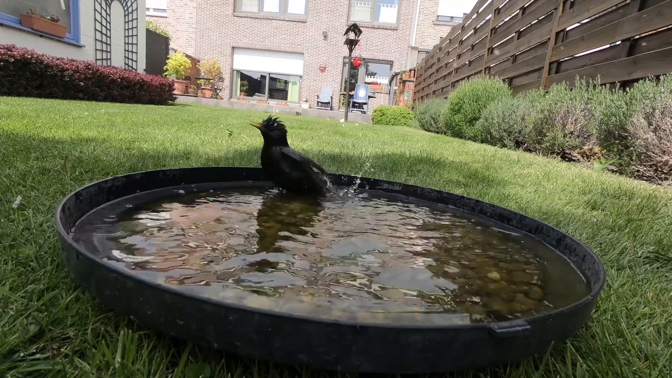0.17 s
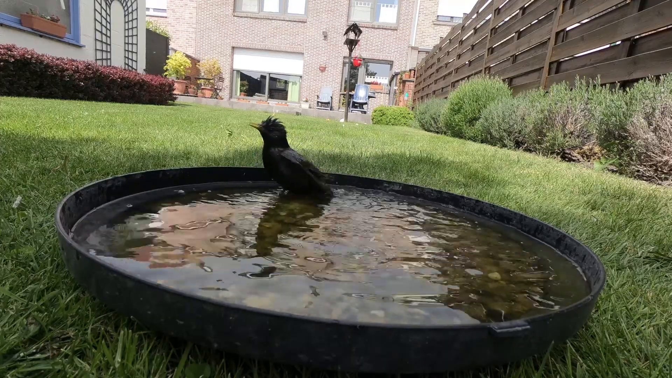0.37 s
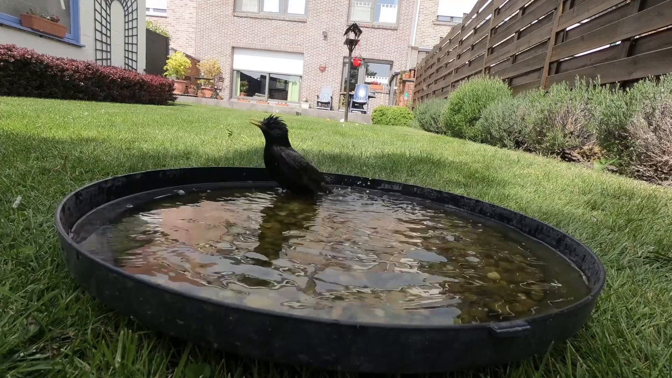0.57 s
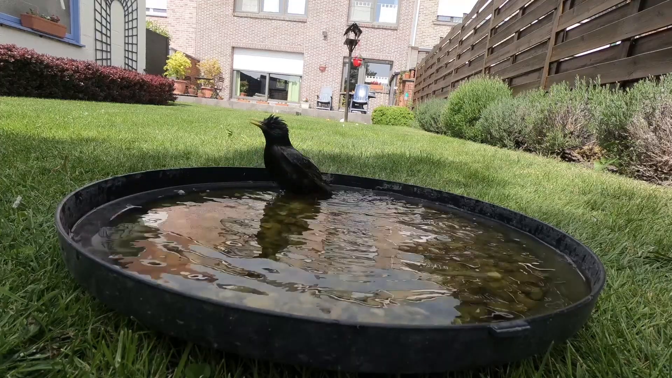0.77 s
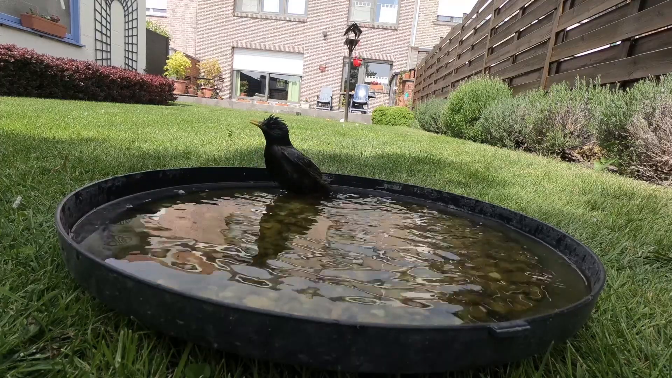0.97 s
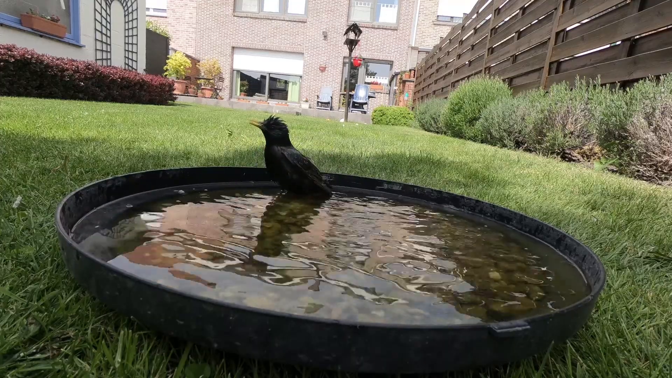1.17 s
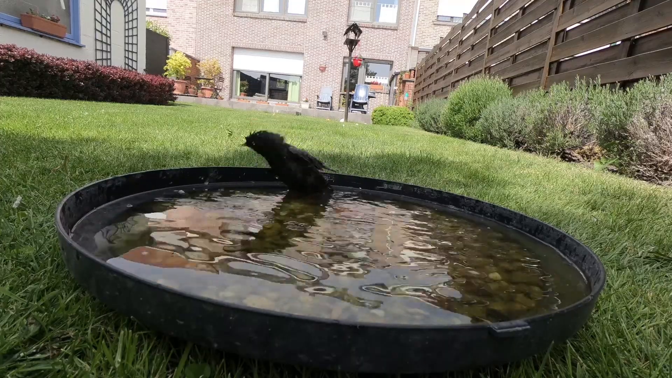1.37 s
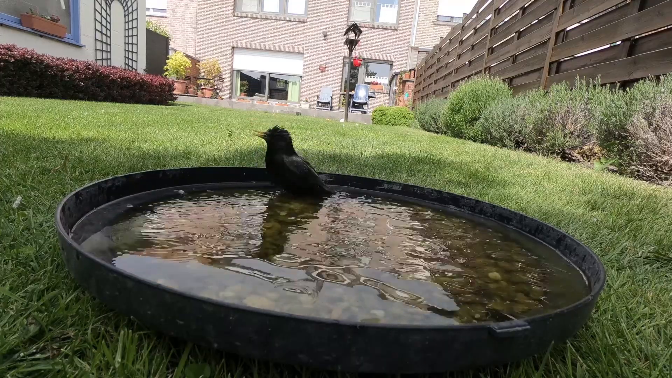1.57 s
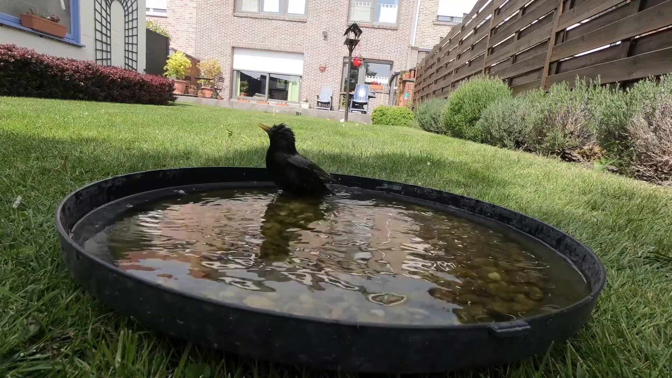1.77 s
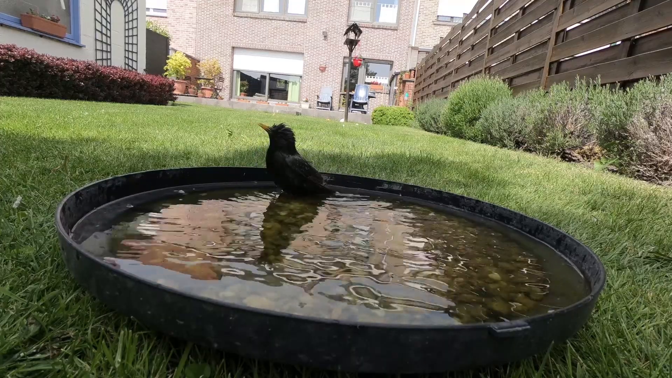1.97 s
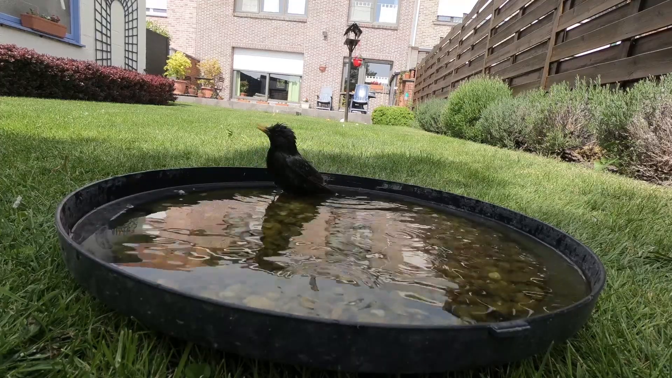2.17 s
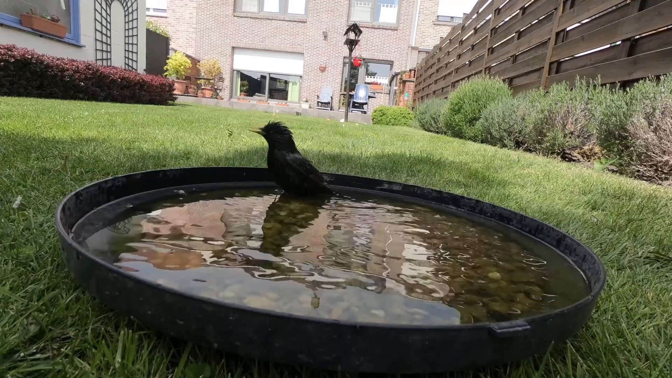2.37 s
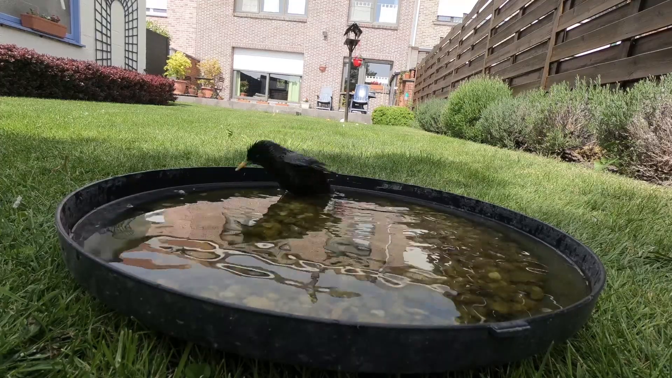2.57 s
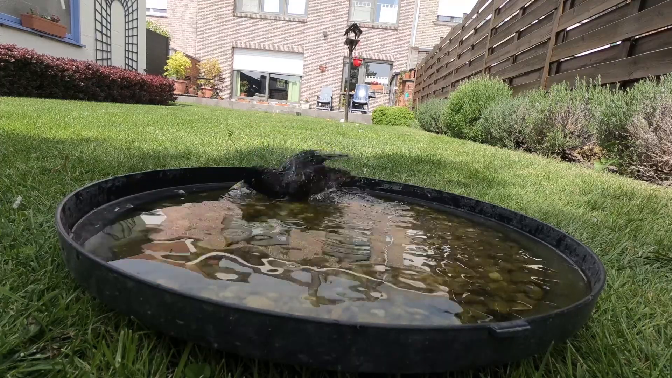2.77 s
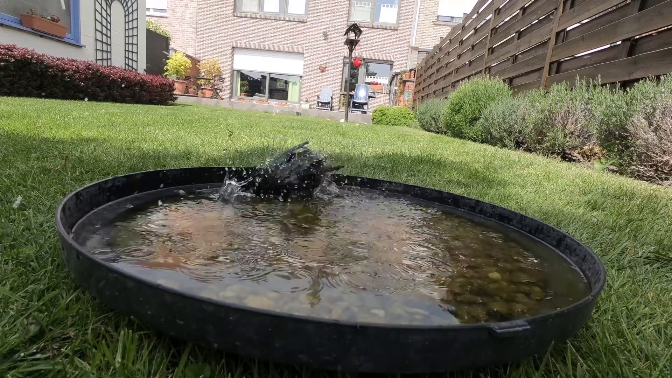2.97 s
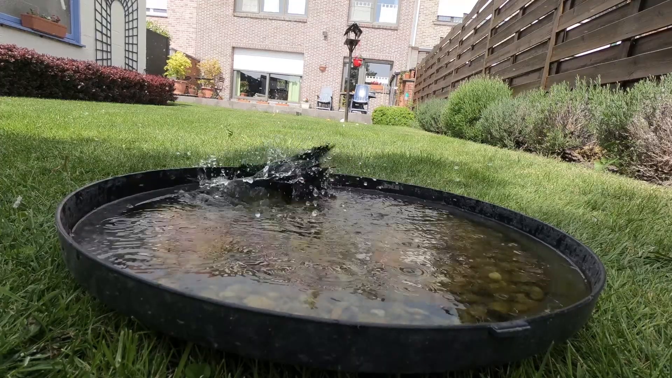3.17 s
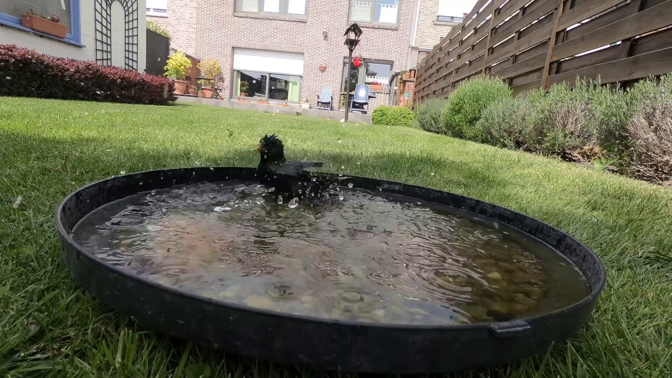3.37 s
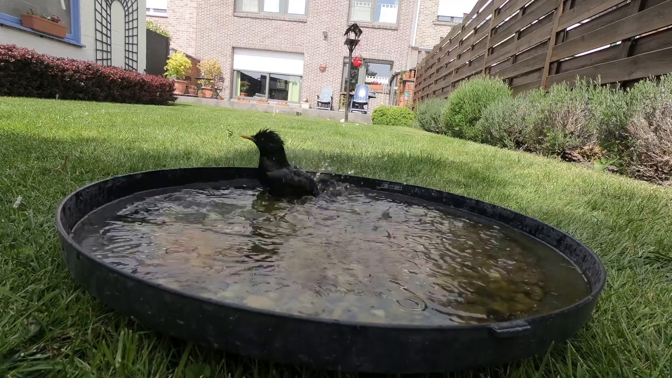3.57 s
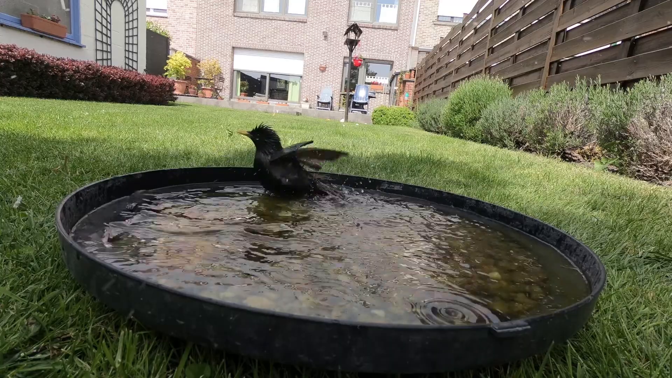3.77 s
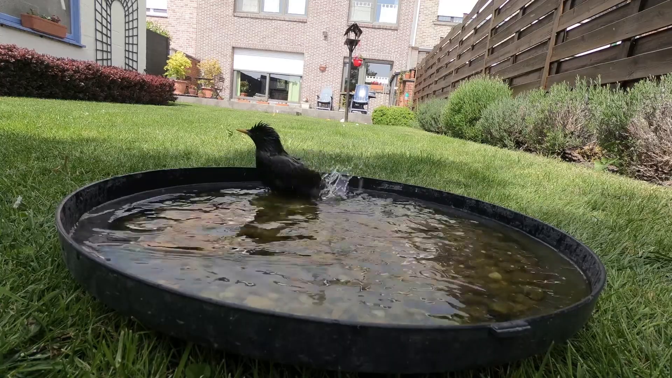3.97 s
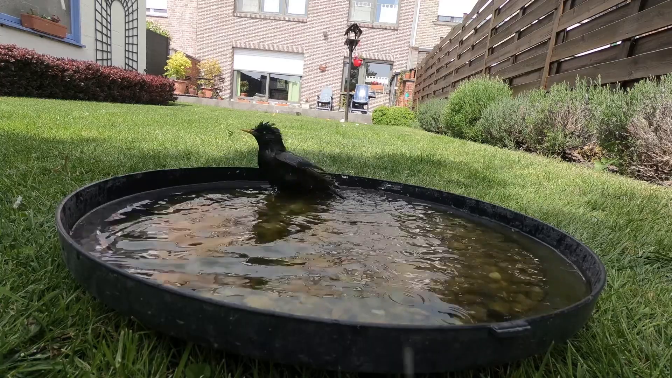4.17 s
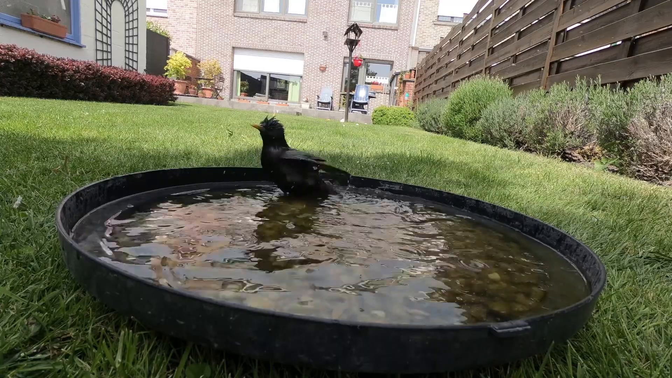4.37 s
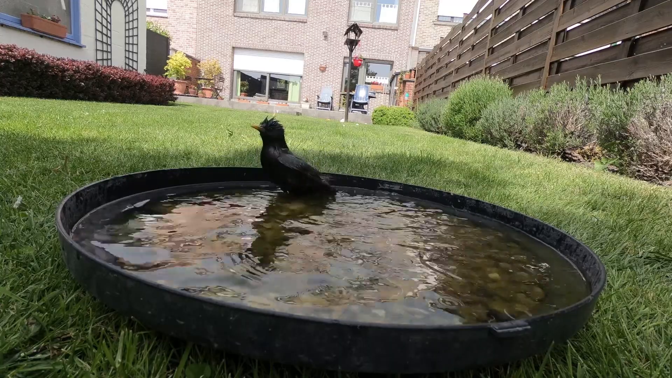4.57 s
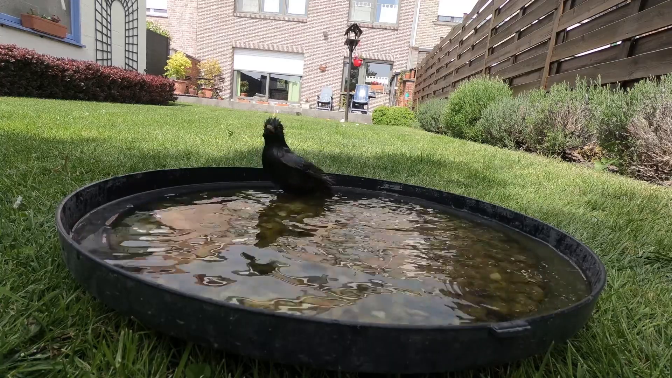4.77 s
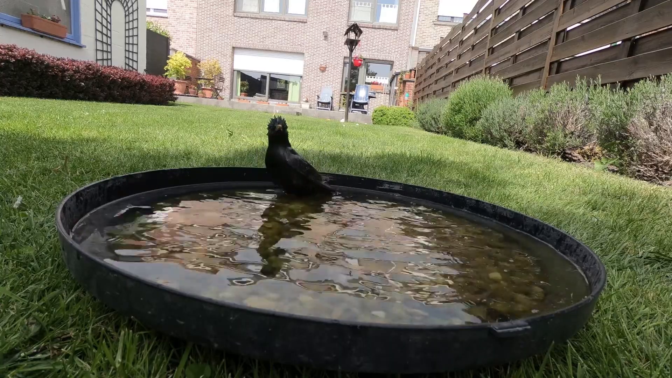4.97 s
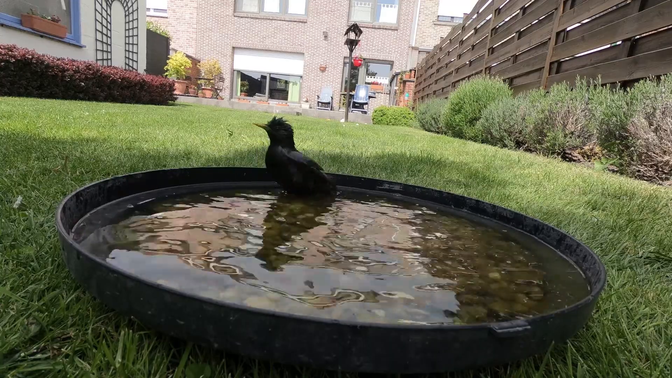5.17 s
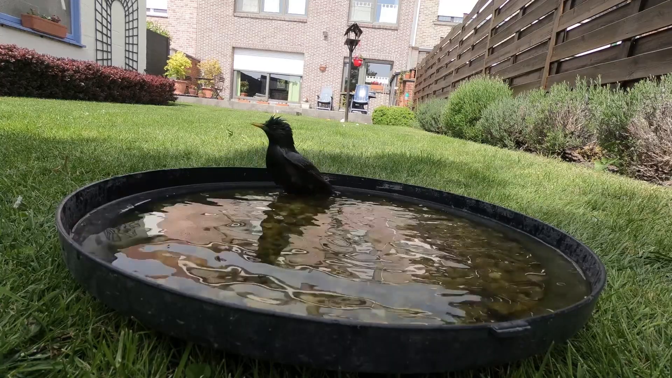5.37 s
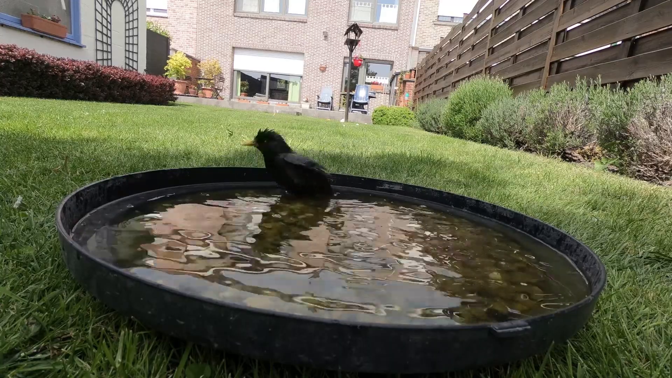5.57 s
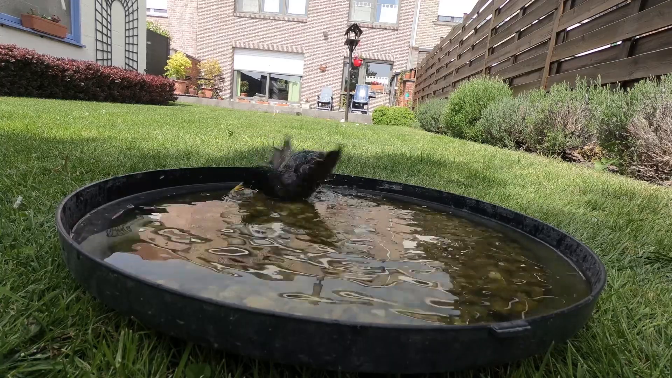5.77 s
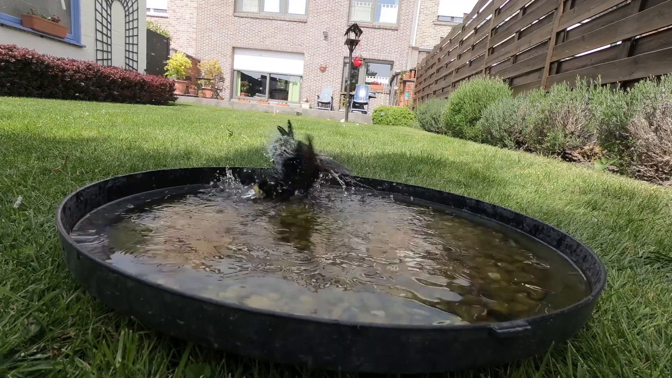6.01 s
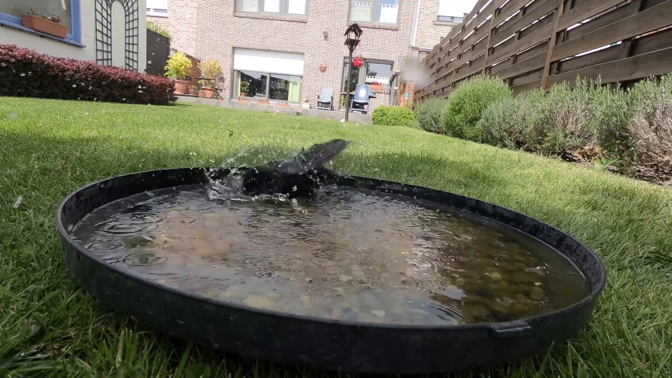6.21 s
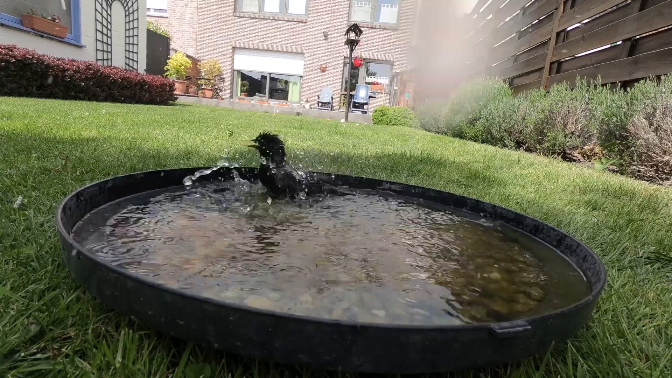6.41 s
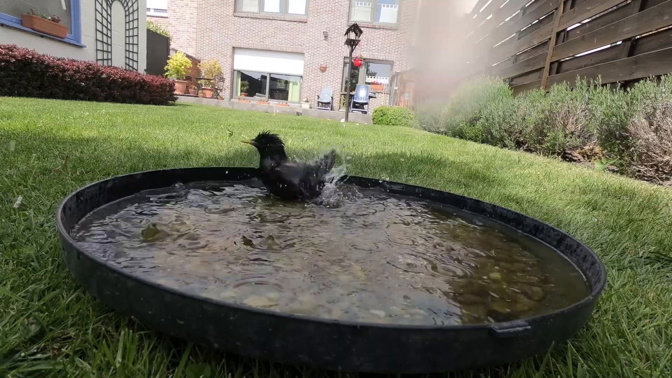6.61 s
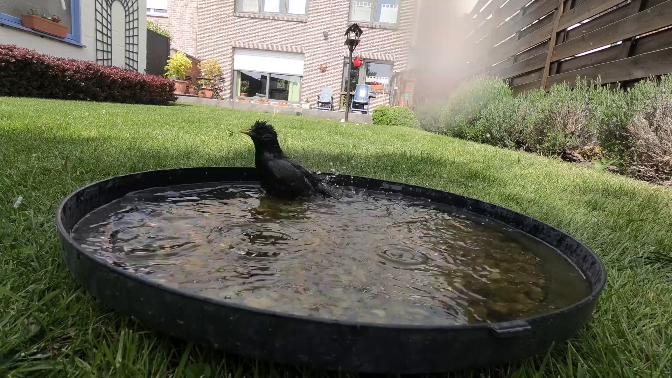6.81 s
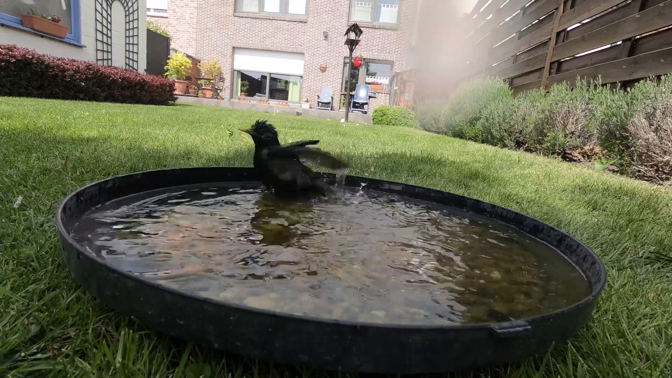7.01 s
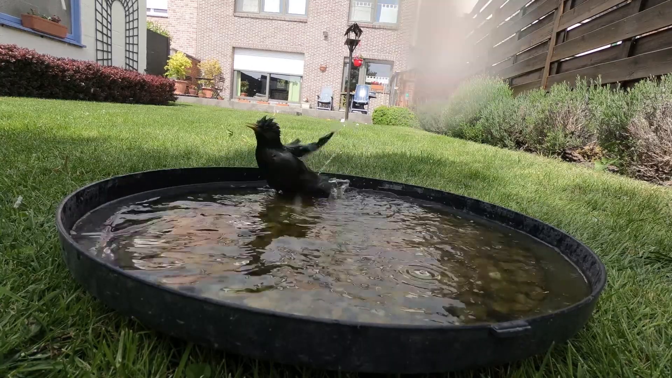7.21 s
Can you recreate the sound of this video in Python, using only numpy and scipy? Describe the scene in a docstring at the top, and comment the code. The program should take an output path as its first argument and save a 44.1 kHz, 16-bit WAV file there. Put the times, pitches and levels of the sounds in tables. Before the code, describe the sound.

Quick fluttering splashes with puffs of air and spray, pauses between them, a far soft hooting call and thin chirps in a quiet garden.

```python
"""Quick wet slaps, spray and puffs of air: a bird bathes in a shallow plastic dish on a lawn, near a stereo camera.
Wingbeats push air (pressure swings); they and falling water smack the dish (noise bursts, swarms of bubbles).
When the bird ducks in, the water churns and bubbles; one drop rings the camera's housing (decaying sines).
Behind lie a low town hum and light wind (shaped noise), a far hooting call and two thin chirps (gliding tones)."""
import sys
import numpy as np
from scipy import signal
from scipy.fft import rfft, irfft, next_fast_len
from scipy.io import wavfile
from scipy.ndimage import uniform_filter1d

SR = 44100
rng = np.random.default_rng(int(sys.argv[2]) if len(sys.argv) > 2 else 0)


def store_wav(level_fs):
    """Save 16-bit WAV to argv[1]."""
    pcm = np.round(np.clip(np.atleast_2d(level_fs), -1, 1) * 32767)
    wavfile.write(sys.argv[1], SR, pcm.T.astype(np.int16))


N = 319725
TIME = np.arange(N) / SR

# Wingbeats and smacks of falling water. Each row: time in seconds, relative strength of the air push in dB,
# relative slap on the water in dB, ring of the air pocket in Hz.
WATER_HITS = [(0.0266, -52.5, -45, 2300), (0.1281, -40.5, -39, 4700), (0.2352, -42.5, -34.5, 8600),
              (0.3326, -48, -44.5, 2260), (0.421, -37, -36, 2600), (0.5146, -45.5, -43.5, 2520),
              (0.6264, -56, -37, 3750), (1.454, -69, -47, 2050), (1.5587, -67, -55, 1400),
              (1.651, -62, -48, 1830), (2.9399, -45.5, -50, 2300), (3.0414, -54, -36, 1970),
              (3.0915, -47.5, -40, 4800), (3.158, -47, -40.5, 1860), (3.1992, -54.5, -53, 2100),
              (3.259, -53, -45, 1500), (3.374, -47.5, -30.5, 5600), (3.4308, -45, -39.5, 10200),
              (3.499, -40.5, -42, 4360), (3.5807, -44.5, -40.5, 3660), (3.651, -35, -32.5, 1600),
              (3.7213, -32.5, -33.5, 4000), (3.8142, -35, -37, 1820), (3.8903, -34.5, -23, 4500),
              (3.97, -41, -37.5, 3000), (4.059, -43, -39, 2850), (4.14, -38, -39.5, 5030),
              (4.22, -42.5, -45, 3020), (4.3096, -35, -28, 6000), (4.399, -35, -35, 2830),
              (4.5101, -57.5, -52.5, 2900), (4.635, -66, -46, 1200), (6.0458, -44, -39, 2500),
              (6.111, -48.5, -45, 3800), (6.148, -56, -40.5, 1700), (6.193, -47, -49, 2000),
              (6.259, -37.5, -34, 1700), (6.4001, -49, -45, 2290), (6.484, -39.5, -46, 3070),
              (6.518, -72, -40, 1180), (6.551, -39.5, -39.5, 2090), (6.628, -38.5, -39.5, 1600),
              (6.7098, -34.5, -35, 1850), (6.7909, -34, -32, 4330), (6.8677, -35.5, -31.5, 2420),
              (6.9594, -38, -30, 3320), (7.0497, -39, -31.5, 2450), (7.1366, -34, -26.5, 3160),
              (7.2163, -34, -30.5, 2230)]
# Bouts of bathing. Each row: start of the dip in seconds, deepest in the water in seconds, stop in seconds,
# relative level of the stirred water in dB, relative flutter of the feathers in dB.
BOUTS = [(-.3, 0.047, .62, -67, -60), (1.38, 1.432, 1.67, -71, -68), (2.69, 2.9, 4.43, -51.5, -53.5),
         (5.77, 5.92, 7.1, -49, -49)]
# Spectra of spray, of wind and eddies, and of feathers. Each row: frequency in Hz, relative density in dB per Hz.
SPRAY = [(300, -8), (600, -3.5), (1200, 0.5), (2200, 0), (4200, -5), (5200, -9), (6500, -3.5), (8300, -11),
         (9700, -8), (11500, -18.5), (16000, -23)]
GUST = [(15, -19), (30, -5), (50, 2.5), (80, -9), (130, -21), (300, -56), (900, -78)]
FEATHERS = [(30, -20), (70, -12.5), (110, -9.5), (170, 1.5), (260, -3.5), (330, -7.5), (480, -20.5),
            (1000, -39.5), (3000, -65)]
# Left-right likeness of near sound. Each row: frequency in Hz, likeness from 0 to 1.
NEAR_LIKENESS = [(100, 0.89), (220, 0.65), (380, 0.12), (800, 0.83), (4300, 0.95), (7000, 0.38),
                 (12000, 0.52)]


def slaps(slap_s=0.0014, second_hit_s=0.0064, spray_s=0.0063, skim_s=0.0081,
          slap_db=7, spray_db=-2.0, skim_db=-4, pocket_db=7, pocket_width=0.13):
    """A wing or falling water cracks on the surface, trapping a pocket of air; spray swells before and after."""
    # Crack spectrum. Each row: frequency in Hz, relative density in dB per Hz.
    slap_spectrum = [(150, -7.5), (350, -17), (550, -11.5), (900, -1.5), (1500, 1.5), (3000, -4),
                     (4400, -3), (5100, -7), (6300, 0), (8200, -8), (9600, -4.5), (11000, -15.5),
                     (16000, -26.5)]
    bright_db_per_octave, neutral_pocket_hz = 6.5, 2700  # a small, high pocket goes with a bright slap
    spray_by_push, spray_by_depth = 0.56, 0.31  # dB of spray per dB of air push and of stirred water
    out = np.zeros((2, N))
    drops = patter(36000, cycles=11, spread_db=3.5)
    t = np.arange(-1280, 2816) / SR
    hz = np.geomspace(100, 17000, 80)
    hit = np.maximum(t, 0) / slap_s
    crack_envelope = (1 - np.exp(-9 * hit)) * np.exp(-hit)
    for s, push_db, crack_db, pocket_hz in WATER_HITS:
        bright_db = bright_db_per_octave * np.log2(pocket_hz / neutral_pocket_hz)
        pocket_peak = pocket_db * np.exp(-(np.log(hz / pocket_hz) / pocket_width) ** 2)
        spectrum = np.c_[hz, read(slap_spectrum, hz) + pocket_peak]
        burst = rng.standard_normal((2, len(t)))
        crack = colour(burst, spectrum, NEAR_LIKENESS, bright_db) * crack_envelope
        crack /= np.sqrt(np.sum(crack ** 2) / (slap_s * SR))

        late = t - second_hit_s * rng.uniform(0.96, 1.154)
        skim = amp(skim_db) * np.exp(np.minimum(t, 0) / skim_s)
        thrown = np.where(late > 0, np.exp(-abs(late) / spray_s), skim)
        near_drops = drops[:, int(s * SR):][:, :len(t)]
        spray = colour(near_drops, SPRAY, NEAR_LIKENESS, 0.61 * bright_db) * thrown
        wet_db = spray_by_push * push_db + spray_by_depth * stirred_water_db(s)
        add(out, s + t[0], amp(crack_db + slap_db) * crack + amp(wet_db + spray_db) * spray)
    return out


def churn(fizz_db=-1.6, bubbles_db=-5.0):
    """Stirred water: clumps of crackling droplets and longer-ringing bubbles."""
    # Bubble spectrum. Each row: frequency in Hz, relative density in dB per Hz.
    gurgle_spectrum = [(800, -20.5), (1400, -12.5), (2300, 3), (4000, -2.5), (7000, -3), (12000, -11)]
    droplets = patter(30000, cycles=9, spread_db=5.0)
    fizz = colour(droplets, SPRAY, NEAR_LIKENESS)[:, :N] * drift(130, spread_db=3.3)
    swarm = patter(3200, cycles=24, spread_db=4.5)
    gurgle = colour(swarm, gurgle_spectrum, NEAR_LIKENESS)[:, :N]
    return amp(stirred_water_db(TIME)) * (amp(fizz_db) * fizz + amp(bubbles_db) * gurgle)


def plops(plop_db=.5, splatter_db=-13, splatter_s=.0058, tick_db=-7, tick_s=.0008):
    """Single large bubbles, each with the tick and brief splatter of the drop that makes it."""
    # Each row: time in seconds, relative level in dB, starting pitch in Hz, rise as a share of that pitch per second.
    large_bubbles = [(.3495, -54, 3140, 9), (.404, -52, 5100, 7), (1.419, -48.5, 2270, 4.3),
                     (1.683, -48, 2660, 10), (1.865, -53, 7600, 4.1), (2.915, -47, 1690, 19),
                     (3.21, -45.5, 1640, 7), (3.353, -32.5, 5750, 3.7), (3.629, -35.5, 2600, 5.7),
                     (3.6559, -34, 1040, 3.5), (3.7766, -31.5, 2160, 4), (3.7828, -38.5, 1650, 6),
                     (3.802, -31, 1860, 1), (4.152, -38.5, 3460, 6), (4.2384, -47, 2378, 6.7),
                     (4.617, -56, 2600, 1), (5.298, -62, 4200, 1), (5.928, -39.5, 1385, 24),
                     (6.0287, -34, 2780, 23), (6.0673, -33.5, 1287, 24), (6.1722, -41, 1800, 15),
                     (6.203, -37, 3600, 8), (6.3273, -29, 4330, 4.4), (6.593, -38.5, 3130, 14),
                     (6.613, -38, 2270, 4), (6.6241, -31, 1550, 6.2), (6.6622, -30, 2240, 7.4),
                     (6.7605, -40, 3770, 9), (6.954, -35, 4500, 6), (7.0169, -37, 4880, 5),
                     (7.1477, -36.5, 4100, 7), (7.1786, -40.5, 2780, 5.5)]
    ring_cycles, cycles_per_rise = 31, 3.06  # bubbles near the surface glide faster and ring longer
    out, t = np.zeros((2, N)), np.arange(2048) / SR
    impact = amp(tick_db) * np.exp(-t / tick_s) + amp(splatter_db) * np.exp(-t / splatter_s)
    for s, db, hz, rise in large_bubbles:
        t60 = (ring_cycles + cycles_per_rise * rise) / hz
        add(out, s, amp(db + plop_db) * bubble(hz, t60, rise))
        near_pitch = [(hz / 2, -12), (hz, 0), (hz * 2, -8), (hz * 10, -32)]
        splash = colour(rng.standard_normal((2, len(t))), near_pitch, NEAR_LIKENESS)
        add(out, s, amp(db) * impact * splash)
    return out


def stirred_water_db(s):
    """Stirred-water level at s: swells as the bird dips, sinks as it emerges, settles faster once it stops."""
    still_db, emerge_db_per_s = -77, 11.5
    settle_db_per_s = 50  # on top of the emerging slope
    bouts = []
    for start, deepest, stop, db, _ in BOUTS:
        dip = np.interp(s, [start, deepest], [still_db, db], left=-120)
        emerge = emerge_db_per_s * np.maximum(s - deepest, 0)
        settle = settle_db_per_s * np.maximum(s - stop, 0)
        bouts.append(dip - emerge - settle)
    return np.max(bouts, axis=0)


def air_pushes(width_s=.0024, swing_db=-9, swing_hz=64, push_db=8):
    """Air squeezed at each hit, most strongly under a beating wing: a quick pressure swing inside a slower one."""
    out, t = np.zeros(N), np.arange(-1500, 1500) / SR
    for s, db, *_ in WATER_HITS:
        stretch = rng.uniform(0.69, 1.496)  # scales the swings in time
        slow_phase, fast_phase = rng.uniform(0, 2 * np.pi, 2)
        u = t / (width_s * stretch)
        quick = np.exp(-abs(u) / 1.06) * np.cos(2.4 * u + fast_phase)
        slow = np.exp(-(t / 0.0126) ** 2) * np.cos(2 * np.pi * swing_hz * t / stretch + slow_phase)
        add(out, s + t[0] + 0.0023, amp(db + push_db) * (quick + amp(swing_db) * slow))
    return out


def wakes(wake_db=-22, by_push=0.64, lag_s=.01, wake_s=.02, rustle_db=-13, rustle_s=.011):
    """A feathery rustle around each hit and a soft eddy of air just after, both following the air push."""
    eddies = sum(swell(s + lag_s, wake_s, wake_db + by_push * db) for s, db, *_ in WATER_HITS)
    rustles = sum(swell(s, rustle_s, rustle_db + db) for s, db, *_ in WATER_HITS)
    return eddies * noise(GUST, NEAR_LIKENESS) + rustles * noise(FEATHERS, NEAR_LIKENESS)


def flutter(attack_s=.16, release_s=.2, end_share=.6):
    """Feathers flutter in the air through each bout, and when the bird shakes its head."""
    # Time in seconds, half length in seconds, relative level in dB.
    head_shake = (4.98, .1, -57.5)
    gain = swell(*head_shake)
    for start, _, stop, _, db in BOUTS:
        corners = [start, start + attack_s, stop, stop + release_s]
        gain = gain + amp(db) * np.interp(TIME, corners, [0, 1, end_share, 0])
    return gain * drift(25, spread_db=2.8) * noise(FEATHERS, NEAR_LIKENESS)


def knock():
    """A thrown drop rings the modes of the camera's housing."""
    # Time in seconds, relative strength in dB.
    drop_on_camera = (6.3082, -20.5)
    # Housing modes. Each row: frequency in Hz, relative level in dB, t60 in seconds.
    housing_modes = [(245.4, -12, 0.061), (485, -16.5, .012), (906, -3, .008), (1357, 4.5, 0.017),
                     (1644, -6, 0.0089), (2430, -16, .016), (3900, -12, 0.0069), (7140, -11, .0032)]
    out, t = np.zeros(N), np.arange(4096) / SR
    s, strength_db = drop_on_camera
    for hz, db, t60 in housing_modes:
        add(out, s, amp(strength_db + db - 60 * t / t60) * np.sin(2 * np.pi * hz * t))
    return out


def hooting(waver=.008, peak_share=.4):
    """Each note is a nearly pure tone that swells, fades and glides between two pitches."""
    # Each row: start in seconds, length in seconds, first pitch in Hz, last pitch in Hz, relative level in dB.
    hoot_notes = [(2.247, .14, 757, 733, -57), (2.4, .19, 718, 712, -62), (2.598, .2, 742, 734, -51),
                  (2.781, .18, 724, 852, -55)]
    out = np.zeros(N)
    for s, length, first_hz, last_hz, db in hoot_notes:
        u = np.linspace(0, 1, int(length * SR))
        glide_hz = first_hz + (last_hz - first_hz) * u
        pitch_hz = glide_hz * wavering(waver)[:len(u)]
        arch = np.sin(np.pi / 2 * np.interp(u, [0, peak_share, 1], [0, 1, 0]))
        add(out, s, amp(db) * arch * np.sin(2 * np.pi * np.cumsum(pitch_hz) / SR))
    return out


def chirps():
    """Small birds: a thin whistle, and a twitter made buzzy by a strong waver of pitch."""
    # Pitch curves. Each row: time in seconds, pitch in Hz, level in dB.
    thin_curve = [(4.252, 4400, -69), (4.262, 5070, -64), (4.269, 5800, -55), (4.29, 5880, -50.5),
                  (4.303, 5700, -55.5)]
    buzzy_curve = [(4.335, 3900, -66), (4.365, 4440, -60), (4.39, 5200, -59), (4.44, 5010, -70),
                   (4.5, 4400, -72)]
    return whistle(thin_curve) + whistle(buzzy_curve, waver=0.095)


def garden(x):
    """Scattered echoes from fence, hedges and house, different at each port."""
    # Decay. Each row: frequency in Hz, t60 in seconds.
    echo_t60 = [(200, 0.31), (1500, 0.16), (5000, 0.22), (12000, 0.14)]
    size = SR // 2
    sparse = rng.random((2, size)) < 2500 / SR
    after_gap = np.arange(size) > .008 * SR
    taps = rng.standard_normal((2, size)) * sparse * after_gap
    hz, t, z = signal.stft(taps, SR, nperseg=256)
    decay = amp(-60 * t / read(echo_t60, hz)[:, None])
    tail = signal.istft(z * decay, SR, nperseg=256)[1]
    return signal.oaconvolve(x[None], tail / np.linalg.norm(tail[0]), axes=1)[:, :N]


def background(hum_db=-55.5, breeze_db=-61):
    """Low hum of the town, and a light breeze with a few gusts on the microphone."""
    # Hum spectrum. Each row: frequency in Hz, relative density in dB per Hz.
    hum_spectrum = [(30, -9.5), (100, -11), (170, 5.5), (240, -6), (350, -17), (540, -21.5), (780, -9.5),
                    (1050, -23.5), (1400, -27), (2300, -35), (4500, -40.5), (7500, -35), (10500, -40),
                    (12500, -45), (15000, -83)]
    # Left-right likeness of far sound. Each row: frequency in Hz, likeness from 0 to 1.
    far_likeness = [(50, 0.6), (150, 0.63), (280, 0), (550, 0.99), (900, 0.99), (1400, 0.9), (2300, 0.17),
                    (4000, 0.49), (6000, 0)]
    # Each row: time in seconds, half length in seconds, level in dB.
    gust_times = [(0.013, 0.11, -39), (.57, .04, -47.5), (0.848, 0.12, -56), (2.503, .05, -45.5),
                  (2.853, .035, -40), (3.22, 0.12, -52.5), (5.43, 0.07, -53), (5.88, .035, -47.5),
                  (6.42, .06, -41)]
    gusts = sum(swell(*row) for row in gust_times)
    breeze = amp(breeze_db) * drift(4.4, spread_db=2.2)
    wind = (breeze + gusts) * noise(GUST, [(20, 0.94), (300, 0.81)])
    hum = amp(hum_db) * drift(8.7, spread_db=1.7) * noise(hum_spectrum, far_likeness)
    return hum + wind


def bubble(hz, t60, rise, onset_cycles=0.4):
    """A trapped bubble rings and goes up in pitch as it nears the surface."""
    t = np.arange(int(t60 * SR) + 8) / SR
    onset = 1 - np.exp(-(hz * t / onset_cycles) ** 2)
    return onset * amp(-60 * t / t60) * np.sin(2 * np.pi * hz * (t + rise * t ** 2 / 2))


def patter(per_s, cycles, spread_db, count=40):
    """A swarm of tiny bubbles ringing for a few cycles; the smaller and higher they are, the more there are."""
    size, pitches = next_fast_len(N + 4096), np.geomspace(800, 15000, count)
    swarm = np.zeros((2, size))
    for hz in pitches:
        ring = bubble(hz * rng.uniform(0.97, 1.04), cycles / hz, rise=19, onset_cycles=cycles / 6)
        number = rng.poisson(per_s * hz / pitches.sum() * size / SR)
        boost_db = spread_db * np.minimum(rng.exponential(1, (number, 1)), 4.5)
        strength = amp(boost_db) * rng.standard_normal((number, 2))
        at = rng.integers(0, size - len(ring), (number, 1)) + np.arange(len(ring))
        for side in range(2):
            rings = strength[:, side, None] * ring
            swarm[side] += np.sqrt(hz) * np.bincount(at.ravel(), rings.ravel(), size)
    return swarm


def whistle(rows, waver=0.0053):
    """A nearly pure call that follows its pitch curve with a waver (rms share of the pitch)."""
    s, hz, db = np.transpose(rows)
    pitch_hz = np.interp(TIME, s, hz) * wavering(waver)
    gain = uniform_filter1d(level(np.c_[s, db]), size=200)
    return gain * np.sin(2 * np.pi * np.cumsum(pitch_hz) / SR)


def wavering(share):
    """Random pitch factor around 1, with the given rms deviation."""
    return 1 + share * unit(uniform_filter1d(rng.standard_normal(N), size=100))


def colour(pair, spectrum, likeness, bright_db=0):
    """Gives two unrelated signals a spectrum, a tilt about 4 kHz and a left-right likeness; rms 1."""
    size = pair.shape[1]
    hz, (a, b) = np.fft.rfftfreq(size, 1 / SR), rfft(pair)
    same = np.clip(read(likeness, hz), 0, 1)
    tilt_db = bright_db * .5 * np.tanh(2 * np.log((hz + 1) / 4000))
    gain = amp(read(spectrum, hz) + tilt_db)
    sides = np.array([a, same * a + np.sqrt(1 - same ** 2) * b])
    return unit(irfft(sides * gain, size))


def noise(spectrum, likeness):
    """Steady stereo noise."""
    return colour(rng.standard_normal((2, next_fast_len(N))), spectrum, likeness)[:, :N]


def drift(per_s, spread_db):
    """A gain that wanders between random levels, per_s of them a second."""
    knots = np.arange(0, TIME[-1] + 1, 1 / per_s)
    return amp(spread_db * np.interp(TIME, knots, rng.standard_normal(len(knots))))


def swell(s, half_s, db):
    """A smooth rise and fall of gain around time s."""
    return amp(db) * np.exp(-((TIME - s) / half_s) ** 2)


def level(rows):
    """Gain over time from rows (s, dB); -120 dB outside them."""
    s, db = np.transpose(rows)
    return amp(np.interp(TIME, s, db, left=-120, right=-120))


def amp(db):
    """Decibels to gain."""
    return 10 ** (np.asarray(db) / 20)


def unit(x):
    """Scales to rms 1."""
    return x / np.sqrt(np.mean(x ** 2) + 1e-20)


def read(points, hz):
    """Reads a table on a log-frequency axis."""
    f, value = np.transpose(points)
    return np.interp(np.log(hz + 1), np.log(f + 1), value)


def add(mix, s, sound):
    """Mixes a sound in at time s."""
    part = mix[..., max(round(s * SR), 0):][..., :sound.shape[-1]]
    part += sound[..., :part.shape[-1]]


def scene(water_echo_db=-21, hoot_db=2, hoot_echo_db=-13, hoot_lag_s=0.0001, chirp_echo_db=-3):
    """The bath up close, the other birds farther off."""
    water = slaps() + churn() + plops()
    wings = air_pushes() + wakes() + flutter()
    hoot = amp(hoot_db) * hooting()
    small_birds = chirps()
    echoes = garden(amp(water_echo_db) * water.mean(0) + amp(hoot_echo_db) * hoot
                    + amp(chirp_echo_db) * small_birds)
    # the hoot reaches the left port later
    from_right = np.array([np.interp(TIME - hoot_lag_s, TIME, hoot), hoot])
    return water + knock() + wings + from_right + small_birds + echoes + background()


def record(dry):
    """Two microphone ports differ in phase and level; then the band limit."""
    # Each row: frequency in Hz, lead of the left port in radians.
    port_phase = [(200, .5), (350, 1.35), (550, 2.17), (950, 2.5), (1400, 1.65), (2500, 0.9), (4000, 0.18),
                  (7000, 0.26), (10000, 0.85)]
    # Each row: frequency in Hz, left minus right in dB.
    port_balance = [(60, -2), (200, -2), (380, -3), (700, -1), (1300, 0.5), (2400, 1), (4400, -1),
                    (6300, -4.5), (9000, 0), (15000, 0.5)]
    edge_hz = 16100
    size = next_fast_len(N + 4096)
    hz = np.fft.rfftfreq(size, 1 / SR)
    left = amp(read(port_balance, hz) / 2) * np.exp(.5j * read(port_phase, hz))
    heard = irfft(rfft(dry, size) * np.array([left, 1 / left]), size)[:, :N]
    low_pass = signal.firwin(511, edge_hz, window=("kaiser", 9), fs=SR)
    return signal.oaconvolve(heard, low_pass[None], "same")


dry = scene()
out = record(dry)
store_wav(out)
```